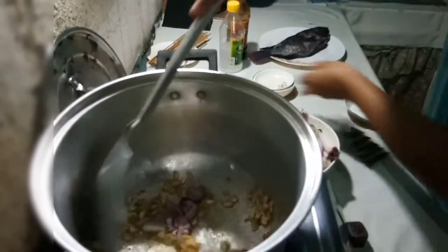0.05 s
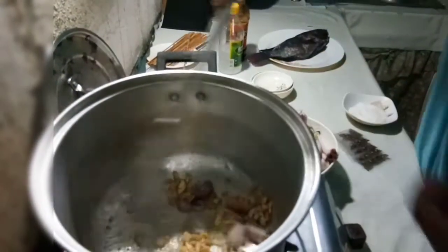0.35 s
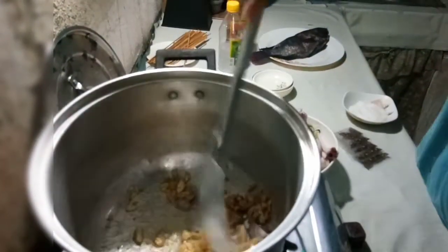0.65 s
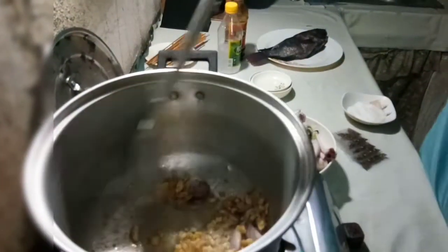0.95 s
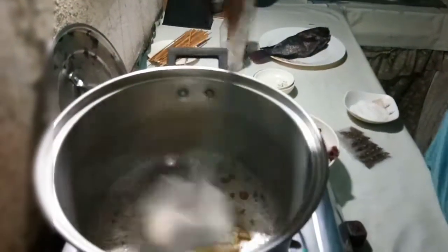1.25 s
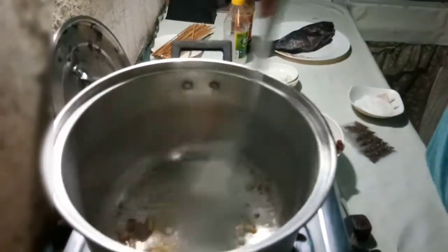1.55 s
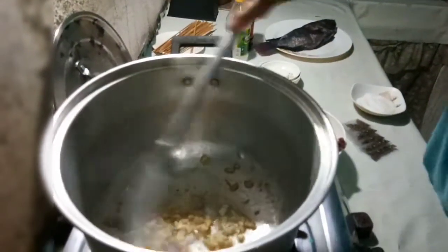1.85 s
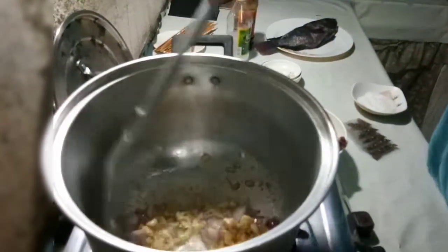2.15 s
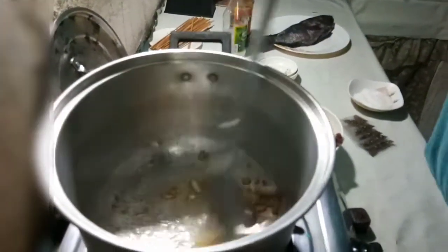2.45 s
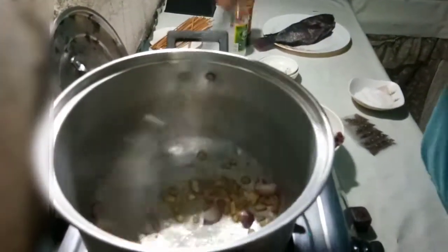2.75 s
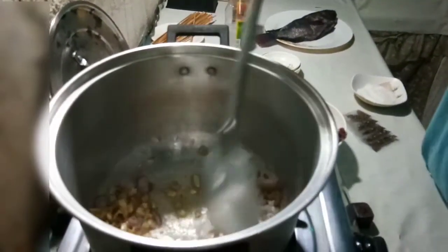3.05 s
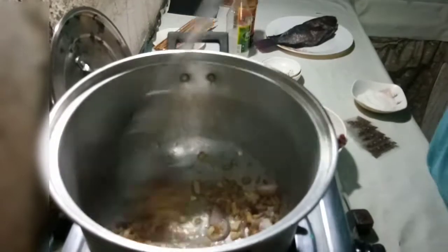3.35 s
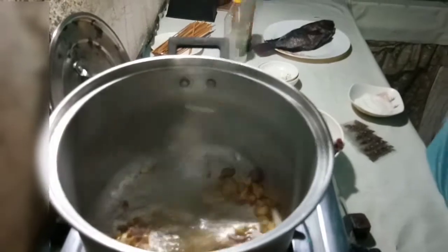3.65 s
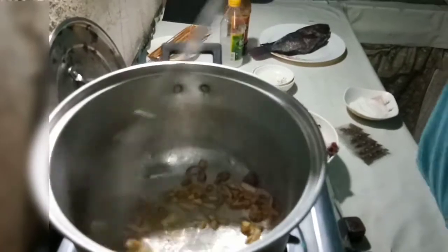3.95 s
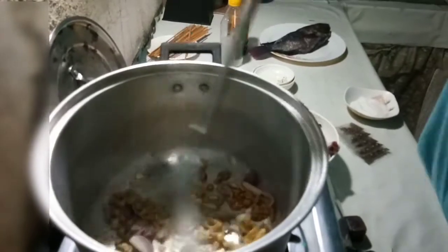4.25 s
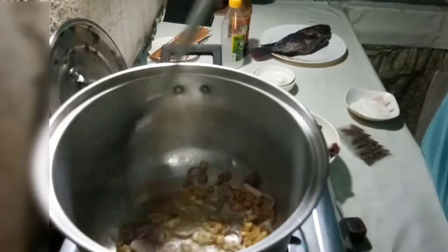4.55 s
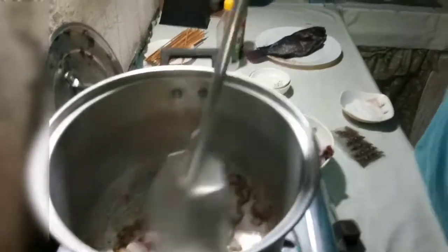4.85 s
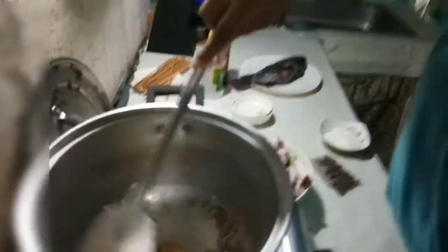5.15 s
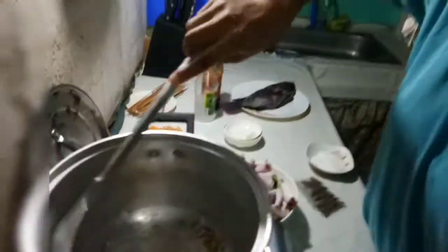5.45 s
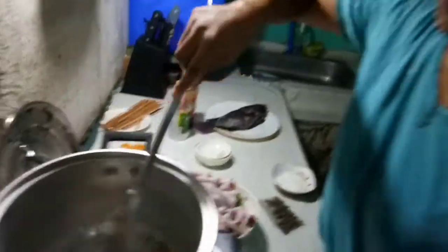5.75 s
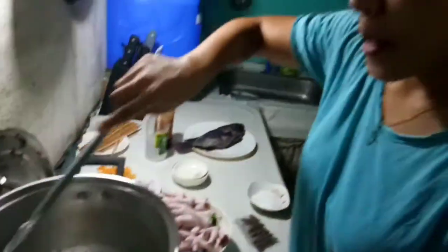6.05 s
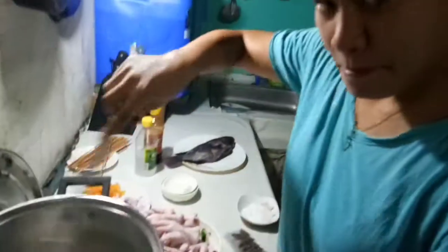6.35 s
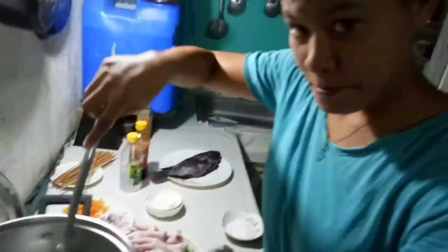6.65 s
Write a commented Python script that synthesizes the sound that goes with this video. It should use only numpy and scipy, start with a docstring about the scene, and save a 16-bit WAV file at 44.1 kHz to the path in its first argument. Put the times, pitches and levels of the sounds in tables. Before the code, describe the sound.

Garlic and onion fry in a little oil in a large metal pot, with a steady high hiss, fine crackles and sharp spits. A metal spatula stirs about three times a second, knocking, briefly ringing the pot and scraping through the food. Near the end it gives one tiny squeak. A faint gas flame rumbles underneath, all close to a mono microphone in a small kitchen.

```python
"""A small kitchen, close to a mono microphone: garlic and onion fry in a little oil in a large metal pot.
Steam hisses out in tiny puffs, the oil film crackles and water drops spit, over a faint gas flame.
A metal spatula lands about three times a second, rings the pot, chatters, drags through the food
and squeaks once by stick-slip. Loud knocks briefly push the gain down."""
import sys
import numpy as np
from scipy import signal
from scipy.fft import rfft, irfft, next_fast_len
from scipy.io import wavfile
from scipy.ndimage import uniform_filter1d

SR = 44100
rng = np.random.default_rng(int(sys.argv[2]) if len(sys.argv) > 2 else 0)


def wrap_up_sound(samples):
    """Save the sound to the file named by the first command line argument, as 16-bit audio."""
    columns = np.atleast_2d(samples).T
    # keep every value between -1 and 1, then stretch to whole-number steps
    tamed = np.clip(columns, -1, 1)
    steps = np.round(tamed * 32767).astype(np.int16)
    wavfile.write(sys.argv[1], SR, steps)


N = 304731
TIME = np.arange(N) / SR
CUTOFF_HZ = 15550

# Spatula strokes. Each row: start in s, press time in s, drag time in s, rumble and rasp in relative dB,
# blade resonance in Hz, extra fizz of the pushed food in dB.
STROKES = [(0.14, 0.018, 0.15, -45, -54, 274, -1), (0.27, .025, 0.047, -43, -33.5, 250, 3.5),
           (0.55, 0.015, .13, -37, -40, 286, 7), (0.955, 0.028, 0.07, -33, -36, 290, 8.5),
           (1.06, 0.073, 0.19, -35.5, -38.5, 290, 8.5), (1.595, 0.011, .035, -40, -38.5, 368, 1.5),
           (1.7, 0.018, 0.041, -46.5, -56, 220, 2), (1.9, 0.015, 0.17, -44, -43, 235, -0.5),
           (2.215, 0.027, 0.074, -33.5, -35.5, 285, 9.5), (2.47, 0.013, 0.084, -34.5, -53, 278, 3),
           (2.7, 0.052, 0.036, -42, -40.5, 255, 0.5), (3.02, 0.031, 0.12, -38.5, -48, 244, -1),
           (3.31, 0.0084, 0.0098, -46.5, -47, 264, 4.5), (3.615, 0.0092, 0.012, -34, -29.5, 252, -3),
           (3.85, 0.069, .09, -40.5, -58, 250, -3.5), (4.225, 0.037, 0.023, -34, -27, 273, 4.5),
           (4.525, 0.015, 0.27, -32, -35, 316, 2), (5.005, 0.028, 0.024, -29.5, -37, 223, 2),
           (5.07, 0.022, 0.12, -46, -58, 255, 2.5), (5.3, 0.047, 0.029, -38, -44, 187, 2.5),
           (5.42, 0.19, 0.18, -44, -53, 268, 4), (5.91, 0.023, .1, -32.5, -37, 261, 4.5),
           (6.16, .015, 0.035, -44.5, -40, 292, 1.5), (6.26, 0.034, 0.055, -52, -46, 230.6, 9),
           (6.53, 0.012, 0.059, -41, -40, 276, -1), (6.83, 0.067, .03, -40.5, -60, 198, -3)]
# Spectrum of the pot's weak, close modes. Each row: frequency in Hz, density in relative dB.
CLATTER = [(60, -56), (150, -11), (400, -3), (600, -2.5), (900, -2), (1700, 1), (3300, 10.5), (5000, 4),
           (7000, 6), (10000, -8)]


def from_db(db):
    return 10 ** (np.asarray(db) / 20)


def rms(x):
    return np.sqrt(np.mean(x ** 2) + 1e-20)


def in_time(rows):
    """Interpolate rows of (s, values..) at every sample."""
    times_s, *columns = np.transpose(rows)
    return [np.interp(TIME, times_s, column) for column in columns]


def drift(rate_hz):
    """Random curve of unit spread, rate_hz knots a second."""
    knots = rng.standard_normal(8192)
    return np.interp(TIME * rate_hz, np.arange(len(knots)), knots) * np.sqrt(3 / 2)


def colour(x, spectrum):
    """Filter by rows of (Hz, dB)."""
    size = next_fast_len(len(x))
    hz, db = np.transpose(spectrum)
    bins_hz = np.fft.rfftfreq(size, 1 / SR) + 1
    gain = from_db(np.interp(np.log(bins_hz), np.log(hz), db))
    return irfft(rfft(x, size) * gain, size)[:len(x)]


def band(x, low_hz, high_hz=np.inf, order=2):
    """Band-pass, upper edge capped at 0.45 SR."""
    sos = signal.butter(order, [low_hz, min(high_hz, .45 * SR)], "band", fs=SR, output="sos")
    return signal.sosfilt(sos, x + 1e-18)


def glide(x, hz, width_hz):
    """Resonator with a moving centre."""
    carrier = np.exp(2j * np.pi * np.cumsum(hz) / SR)
    return np.real(carrier * signal.lfilter([1], [1, -np.exp(-np.pi * width_hz / SR)], x / carrier))


def add(out, start_s, sound):
    start = max(int(start_s * SR), 0)
    out[start:start + len(sound)] += sound[:N - start]


def grains(per_s, spread_db):
    """Random clicks, many small and few large."""
    sizes = from_db(spread_db * np.minimum(rng.exponential(1, N), 4)) * rng.choice([-1, 1], N)
    return sizes * (rng.random(N) < per_s / SR)


def gas_flame(level_db=-57):
    """Steady low noise of the flame and room."""
    # Each row: frequency in Hz, density in relative dB.
    flame_spectrum = [(20, 3), (50, 2.5), (85, 3.5), (120, 7), (300, 1), (400, -1), (550, 2.5), (800, -13),
                      (1500, -16.5)]
    noise = colour(rng.standard_normal(N), flame_spectrum)
    return from_db(level_db) * noise / rms(noise)


def vigour(pressure, stir_db, lull_db=-1.5, lull_after_s=0.049, lull_width_s=0.062):
    """Hiss and fizz in dB: steam surges at random and lulls after each stroke; stirring livens the fizz."""
    # Each row: time in s, fine hiss and coarse fizz of wet food in relative dB.
    frying_levels = [(0, -32.5, -34), (.12, -33.5, -35.5), (.48, -31, -39), (.6, -27.5, -33.5),
                     (.85, -34.5, -35.5), (1.0, -29, -36.5), (1.35, -30.5, -34.5), (1.6, -33, -36.5),
                     (1.8, -29.5, -33), (2.08, -31, -30), (2.3, -29.5, -40), (2.44, -30.5, -34),
                     (3.0, -33.5, -35.5), (3.25, -29.5, -34), (3.5, -31, -37), (3.72, -35, -38.5),
                     (4.05, -28.5, -32.5), (4.4, -31.5, -36), (4.75, -29, -29), (5.0, -33, -36),
                     (5.3, -30, -33), (5.85, -32.5, -38), (6.25, -30, -36), (6.45, -35, -40),
                     (6.7, -34, -35), (6.91, -35.5, -37.5)]
    hiss_db, fizz_db = in_time(frying_levels)
    lifts_s = [start_s + press_s + drag_s for start_s, press_s, drag_s, *_ in STROKES]
    lull = sum(np.exp(-((TIME - lift_s - lull_after_s) / lull_width_s) ** 2) for lift_s in lifts_s)
    surge_db = 0.82 * drift(rate_hz=30) + lull_db * lull * (1 - pressure)
    return hiss_db + 0.78 * surge_db, fizz_db + surge_db + stir_db


def sizzle(hiss_db, fizz_db, flutter_db=2.0, hiss_patchy_db=1.46, fizz_patchy_db=3.5, crackle_db=-7):
    """Steam escapes in tiny puffs, band by band, among sharp pops of the oil film."""
    # The sizzle as coloured by the microphone's treble peaks. Each row: frequency in Hz, relative dB.
    sizzle_spectrum = [(700, -20), (1200, -28), (1480, -21), (1900, -12.5), (3500, -9.5), (5000, -6.5),
                       (6500, 0), (8000, -10.5), (9800, -1), (12400, -10.5), (13900, -10.5), (14600, -0.5),
                       (15500, 2)]
    edges_hz = [600, 1500, 2500, 3500, 4600, 5800, 7000, 8500, 11500, 17000]
    puffs_db = flutter_db * (drift(90) + drift(400)) / np.sqrt(2)
    pops = grains(per_s=390, spread_db=1.5)
    pops = pops / rms(pops) * from_db(crackle_db)
    hiss, fizz = 0, 0
    for low_hz, high_hz in zip(edges_hz, edges_hz[1:]):
        steam = band(rng.standard_normal(N), low_hz, high_hz, order=4)
        if high_hz < 8000:  # wet food: slower, deeper swells
            fizz += steam * from_db(puffs_db + fizz_patchy_db * drift(130))
        else:
            hiss += steam * from_db(puffs_db + hiss_patchy_db * drift(240))
    hiss = colour(hiss + band(pops, low_hz=2750, order=1), sizzle_spectrum)
    fizz = colour(fizz, sizzle_spectrum)
    hiss /= rms(band(hiss, 9000, 15500, order=4))
    fizz /= rms(band(fizz, 4000, 7500, order=4))
    return hiss * from_db(hiss_db + 2) + fizz * from_db(fizz_db - 1)


def pot_air(fizz_db):
    """Frying keeps the air in the pot faintly ringing."""
    # Each row: frequency in Hz, width in Hz, level in dB re fizz_db.
    air_modes = [(1190, 123, -21.5), (1775, 520, -25), (3750, 870, -21)]
    out = 0
    for hz, width_hz, db in air_modes:
        radius, angle = np.exp(-np.pi * width_hz / SR), 2 * np.pi * hz / SR
        poles = [1, -2 * radius * np.cos(angle), radius ** 2]
        air = signal.lfilter([1, 0, -1], poles, rng.standard_normal(N))
        out += from_db(db) * air / rms(air)
    return out * from_db(fizz_db)


def steam_jet(hz, half_width, fade_s, rise_s=0.0004):
    """A drop flashes to steam: pitched noise, unit rms over its first 6 ms."""
    t = TIME[:2048]
    steam = band(rng.standard_normal(len(t)), hz / (1 + half_width), hz * (1 + half_width))
    steam *= (1 - np.exp(-t / rise_s)) * np.exp(-t / fade_s)
    return steam / rms(steam[t < .006])


def sputter(fizz_db, count, centre_hz, spread_oct, half_width, fade_s, spread_db, gain_db):
    """Drops burst at random times; their level follows the fizz."""
    out = np.zeros(N)
    for start_s, (pitch, smallness) in zip(rng.uniform(0, TIME[-1], count), rng.standard_normal((count, 2))):
        hz = min(centre_hz * 2 ** (spread_oct * pitch), CUTOFF_HZ)
        add(out, start_s, steam_jet(hz, half_width, fade_s) * from_db(-spread_db * smallness))
    return out * from_db(fizz_db + gain_db)


def spits(gain_db=-4):
    """The largest water drops burst in the oil one by one."""
    # Each row: start in s, level in relative dB, pitch in Hz.
    large_drops = [(0.129, -25, 8400), (0.444, -25.5, 6380), (0.3334, -19, 3540), (0.614, -21, 4970),
                   (0.877, -26, 4300), (1.0207, -20.5, 3320), (1.07, -20, 5530), (1.152, -20, 3600),
                   (1.1754, -18, 3700), (1.289, -31, 5040), (1.3858, -21, 4740), (1.452, -23, 3380),
                   (1.642, -26, 7030), (2.4239, -22, 6700), (2.889, -29, 3200), (3.4321, -26, 5000),
                   (4.461, -25, 6350), (4.669, -19, 8740), (4.8993, -17.5, 6040), (5.127, -21.5, 5450),
                   (5.402, -24, 6000), (5.6455, -26.5, 6370), (5.8883, -20, 6140), (6.3007, -24.5, 4560),
                   (6.6283, -22.5, 6300)]
    out = np.zeros(N)
    for start_s, db, hz in large_drops:
        add(out, start_s, steam_jet(hz, half_width=0.14, fade_s=0.006) * from_db(db + gain_db))
    return out


def pot_ring(force, vary_db, detune):
    """The loaded pot and blade ring; mode strength and pitch vary at random with the contact point."""
    # Each row: frequency in Hz, gain in dB, t60 in s.
    pot_modes = [(116.1, -15.5, 0.46), (159, -12, 0.4), (178, -16, 0.32), (212, -13.5, 0.1),
                 (231.6, -16, 0.13), (292.4, -1.5, 0.12), (372, -3, 0.023), (441, -2, .05),
                 (468.5, -6, 0.1), (542.6, -9, 0.16), (651, -15, 0.14), (816, -9, 0.029),
                 (1120, 8.5, 0.028), (1171, 6, 0.062), (1270, -35, 0.047), (1500, -22, 0.0043),
                 (1739, 2, 0.073), (1900, 7.5, 0.028), (2472, -5.5, 0.21), (3040, 11, 0.028),
                 (3321, 9, 0.089), (3634, 20, 0.013), (3680, -23, 0.051), (4450, 10, .04),
                 (5310, -2, 0.033), (5600, 16, 0.01), (6180, 7, 0.064)]
    out = 0
    for hz, db, t60_s in pot_modes:
        radius = from_db(-60 / (t60_s * SR))
        angle = 2 * np.pi * hz * (1 + detune * rng.standard_normal()) / SR
        strength = from_db(db + vary_db * rng.standard_normal()) * rng.choice([-1, 1])
        poles = [1, -2 * radius * np.cos(angle), radius ** 2]
        out += strength * signal.lfilter([0, np.sin(angle)], poles, force + 1e-18)
    return out


def knocks(chatter=0.048, clatter_db=3, tick_s=0.013):
    """The blade lands and chatters; its angle shares the blow among pot, base, wall and blade."""
    # Each row: start in s, pot thud, base knock, wall ring and blade clink in relative dB,
    # chatter decay in s.
    blows = [(0.139, -35.5, -45, -47.5, -55, 0.0064), (0.2792, -32.5, -34.5, -32.5, -23.5, 0.0089),
             (0.319, -36, -36.5, -37, -37, 0.011), (0.548, -33, -39, -44, -32.5, 0.008),
             (0.561, -33, -36.5, -38, -28, 0.0091), (0.666, -34, -50, -43.5, -40, 0.016),
             (0.951, -26, -43, -37.5, -30, 0.017), (1.592, -29, -27, -62, -35, 0.011),
             (1.851, -35.5, -34.5, -34, -24.5, 0.0049), (1.91, -30.5, -45, -47, -33.5, 0.01),
             (1.97, -37, -50, -47, -46, 0.024), (2.17, -39, -30, -31, -23.5, 0.012),
             (2.21, -19.5, -41, -46, -35, 0.0055), (2.477, -34.5, -31, -42, -47, 0.014),
             (2.743, -36.5, -47, -43.5, -44, 0.022), (2.914, -43.5, -46, -43, -34.5, 0.013),
             (3.305, -42, -36, -39, -26, .014), (3.614, -41, -33, -28.5, -22, 0.014),
             (4.204, -27.5, -38.5, -45, -34.5, 0.012), (4.255, -41, -48, -46, -43, .016),
             (4.5194, -21.5, -29.5, -36, -28.5, 0.011), (4.647, -43, -49, -44, -31, 0.011),
             (4.78, -28.5, -39, -65, -54, 0.018), (5.0045, -39, -28, -30, -25, 0.018),
             (5.209, -38, -41.5, -40, -32.5, 0.01), (5.66, -36.5, -35.5, -51, -48, 0.013),
             (5.718, -34.5, -58, -41, -37, 0.011), (5.9066, -29.5, -21.5, -24.5, -28.5, 0.011),
             (6.0, -35, -34.5, -38, -43, .009), (6.24, -42.5, -44.5, -44, -33, 0.023),
             (6.53, -55, -41, -38, -27.5, 0.013)]
    out, t = np.zeros(N), TIME[:SR // 6]
    for start_s, thud_db, base_db, wall_db, clink_db, chatter_s in blows:
        force = chatter * rng.standard_normal(len(t)) * np.exp(-t / chatter_s)
        force[0] = 1
        clatter = colour(rng.standard_normal(len(t)), CLATTER) * np.exp(-t / (1.6 * chatter_s))
        ring = pot_ring(force, vary_db=3.5, detune=0.0046)
        blow = ring / rms(ring[t < .02]) + from_db(clatter_db) * clatter / rms(clatter[t < .005])
        shares = [(173, 398, thud_db + 1), (370, 726, base_db + 2),
                  (992, 1345, wall_db + 1), (2330, np.inf, clink_db + 1.5)]
        for low_hz, high_hz, db in shares:
            part = band(blow, low_hz, high_hz)
            add(out, start_s, part / rms(part[t < .025]) * from_db(db))
        metal_tick = band(rng.standard_normal(len(t)), 1300, 12000, order=1) * np.exp(-t / tick_s)
        add(out, start_s, metal_tick * from_db(clink_db + 1))
    return out


def strokes(touch_db=-16, ease_db_per_s=27, lift_db_per_s=266, sag_oct_per_s=1.97):
    """Control curves: the hand bears down, eases off and lifts; the blade's pitch sags as it unbends."""
    pressure, rumble_gain, rasp_gain, stir_db = np.zeros((4, N))
    blade_hz = np.full(N, float(STROKES[0][5]))
    for start_s, press_s, drag_s, rumble_db, rasp_db, hz, wet_db in STROKES:
        age_s = TIME[:SR] - press_s  # zero at full pressure
        press_db = touch_db * np.maximum(-age_s / press_s, 0)
        ease_db = ease_db_per_s * np.clip(age_s, 0, drag_s)
        lift_db = lift_db_per_s * np.maximum(age_s - drag_s, 0)
        force = from_db(press_db - ease_db - lift_db)
        add(pressure, start_s, force)
        add(rumble_gain, start_s, force * from_db(rumble_db))
        add(rasp_gain, start_s, force * from_db(rasp_db))
        add(stir_db, start_s, force * wet_db)
        start = int(start_s * SR)
        blade_hz[start:] = hz * 2 ** (-sag_oct_per_s * np.clip(TIME[:N - start] - press_s, 0, 1))
    return np.minimum(pressure, 1), rumble_gain, rasp_gain, stir_db, blade_hz


def scraping(rumble_gain, rasp_gain, blade_hz, rough_db=3, clatter_db=-6, blade_db=2, rasp_db=-3, jerk_db=2):
    """The dragged blade slips in small jerks: the base rumbles, the edge rasps, the flexed blade drones."""
    slips = grains(per_s=900, spread_db=3.5) * from_db(rough_db * drift(80))
    ring = pot_ring(slips, vary_db=0, detune=0)
    clatter = colour(slips, CLATTER)
    body = ring / rms(ring) + from_db(clatter_db) * clatter / rms(clatter)
    rumble, rasp = band(body, 99, 690), band(body, 1210, 2640)
    drone = band(glide(slips, blade_hz, width_hz=27), 82, 426)
    rumble = rumble / rms(rumble) + from_db(blade_db) * drone / rms(drone)
    rumble /= np.sqrt(uniform_filter1d(rumble ** 2, size=2200) + 1e-12)  # the hand evens out the pressure
    jerks = from_db(jerk_db * drift(70))  # the blade catches on food
    return jerks * (rumble * rumble_gain + rasp / rms(rasp) * rasp_gain * from_db(rasp_db))


def squeak(upper_ratio=1.72, upper_db=-11, upper_fade_s=0.02, roughness=0.34):
    """Stick-slip locks on to two wall modes and sags in pitch; the upper one soon lets go."""
    # Each row: time in s, pitch in Hz, level in dB.
    contour = [(5.997, 1224, -41), (6.002, 1135, -15.5), (6.013, 1066, -25), (6.022, 1100, -27),
               (6.033, 1100, -33), (6.045, 1100, -65)]
    hz, db = in_time(contour)
    phase = 2 * np.pi * np.cumsum(hz) / SR
    age_s = np.maximum(TIME - contour[0][0], 0)
    upper = from_db(upper_db) * np.exp(-age_s / upper_fade_s) * np.sin(upper_ratio * phase)
    gate = (age_s > 0) & (TIME < contour[-1][0])
    return (np.sin(phase) + upper) * from_db(db) * (1 + roughness * drift(400)) * gate


def kitchen(x, t60_s=0.22, wet_db=-15):
    """Near walls add a short diffuse tail."""
    t = TIME[:SR // 2]
    tail = band(rng.standard_normal(len(t)), 194, 11000, order=1) * from_db(-60 * t / t60_s) * (t > .005)
    return x + from_db(wet_db) * signal.fftconvolve(x, tail / np.linalg.norm(tail))[:N]


def gain_control(x, threshold_db=-25, slope=0.53, release_db_per_s=35, attack_s=0.034, ahead_s=0.0095):
    """Look-ahead compressor: loud knocks briefly duck the whole mix."""
    level_db = 10 * np.log10(uniform_filter1d(x[0] ** 2, size=441) + 1e-12)
    ahead_db = np.interp(TIME + ahead_s, TIME, level_db)
    wanted_cut_db = slope * np.maximum(ahead_db - threshold_db, 0)
    recovery_db = release_db_per_s * TIME
    cut_db = np.maximum.accumulate(wanted_cut_db + recovery_db) - recovery_db
    pole = np.exp(-1 / (attack_s * SR))
    return x * from_db(-signal.lfilter([1 - pole], [1, -pole], cut_db))


def scene():
    """Flame, frying and spatula at one microphone, on both channels."""
    flame = gas_flame()
    pressure, rumble_gain, rasp_gain, stir_db, blade_hz = strokes()
    hiss_db, fizz_db = vigour(pressure, stir_db)
    small_drops = sputter(fizz_db, count=150, centre_hz=6720, spread_oct=0.11, half_width=0.07,
                          fade_s=0.0052, spread_db=3, gain_db=-0.5)
    sharp_pops = sputter(fizz_db, count=35, centre_hz=7500, spread_oct=0.21, half_width=0.47,
                         fade_s=0.00087, spread_db=0, gain_db=-2)
    frying = sizzle(hiss_db, fizz_db) + small_drops + sharp_pops + spits() + pot_air(fizz_db)
    spatula = kitchen(knocks() + scraping(rumble_gain, rasp_gain, blade_hz)) + squeak()
    mono = flame + frying + spatula
    return np.array([mono, mono])


def record(dry):
    """Gain control, then a steep low-pass."""
    low_pass = signal.ellip(14, .1, 90, CUTOFF_HZ, fs=SR, output="sos")
    return signal.sosfilt(low_pass, gain_control(dry))


dry = scene()
out = record(dry)
wrap_up_sound(out)
```